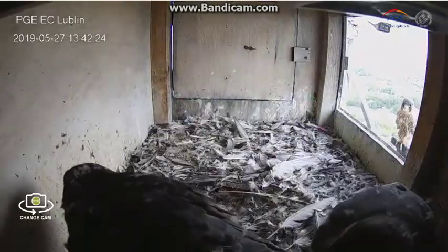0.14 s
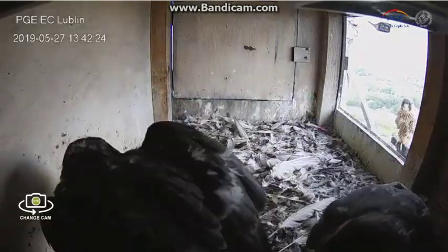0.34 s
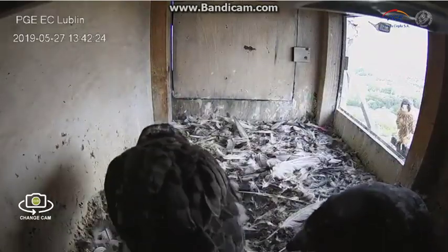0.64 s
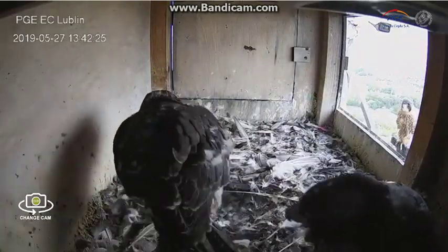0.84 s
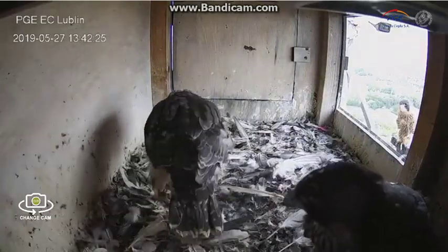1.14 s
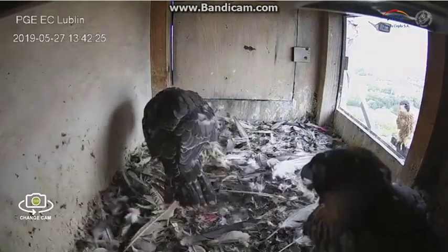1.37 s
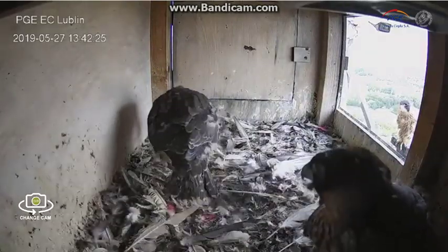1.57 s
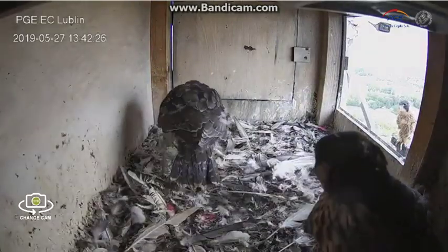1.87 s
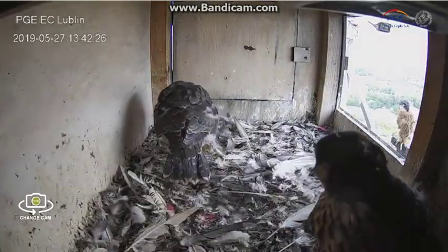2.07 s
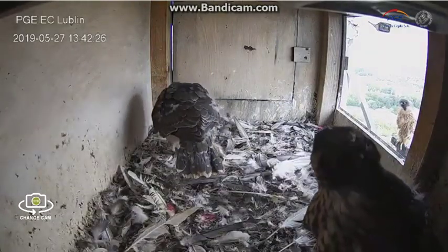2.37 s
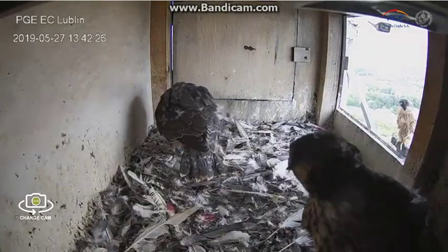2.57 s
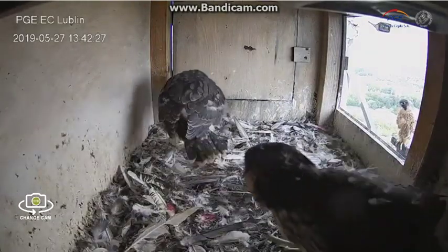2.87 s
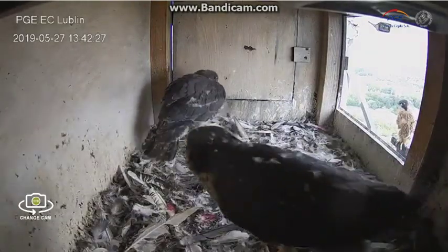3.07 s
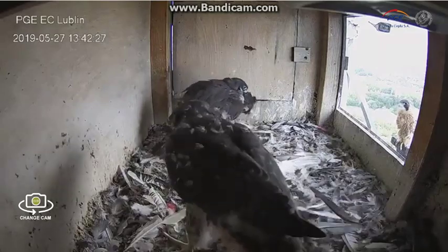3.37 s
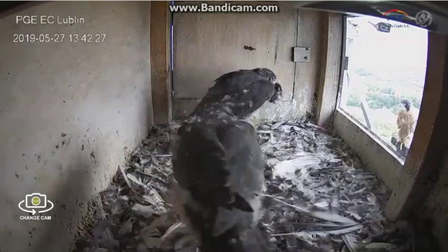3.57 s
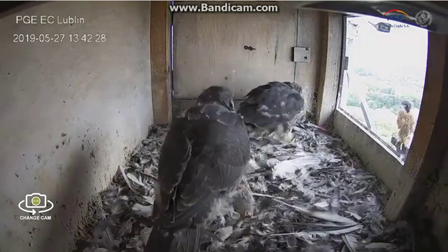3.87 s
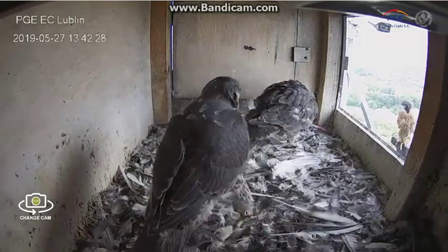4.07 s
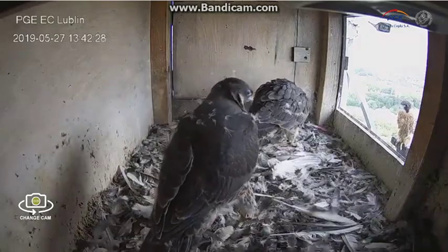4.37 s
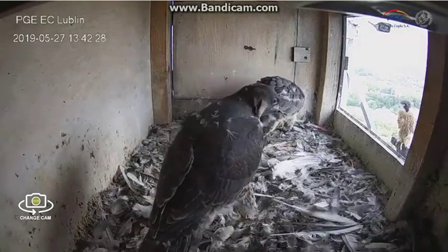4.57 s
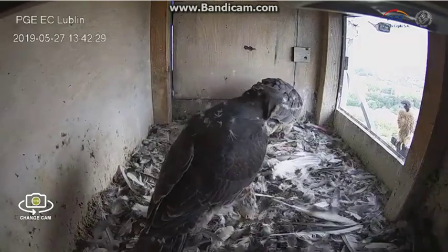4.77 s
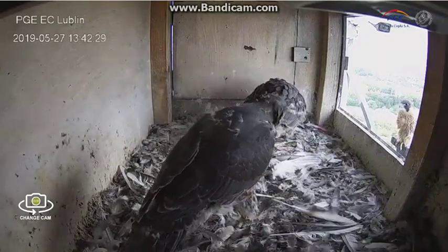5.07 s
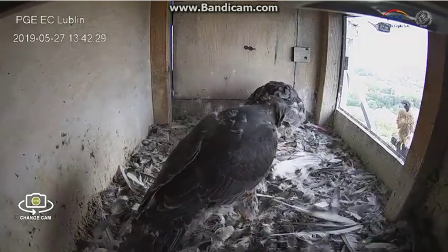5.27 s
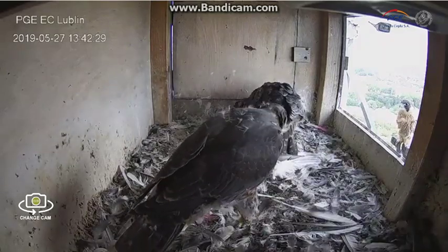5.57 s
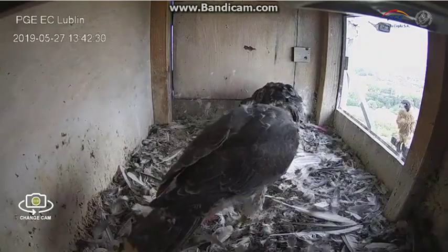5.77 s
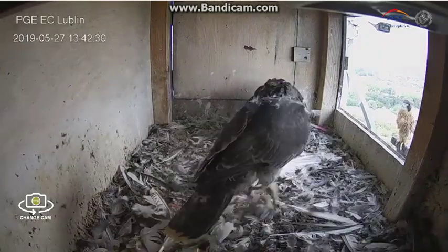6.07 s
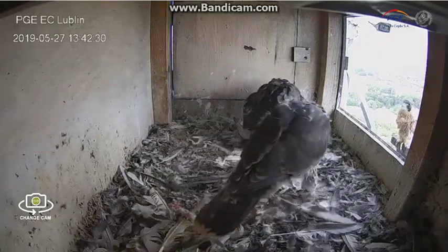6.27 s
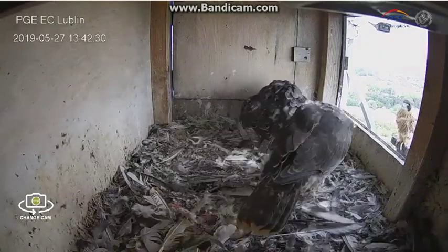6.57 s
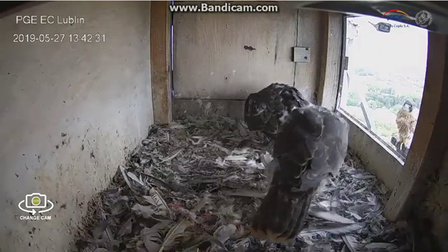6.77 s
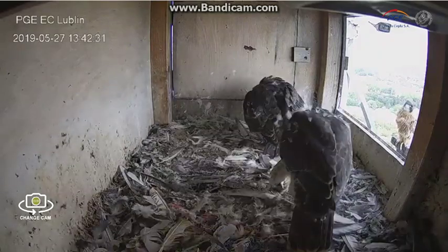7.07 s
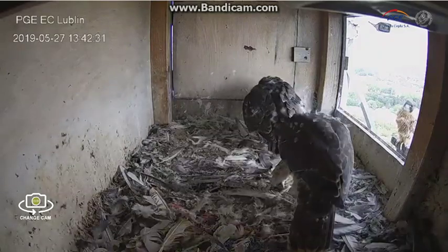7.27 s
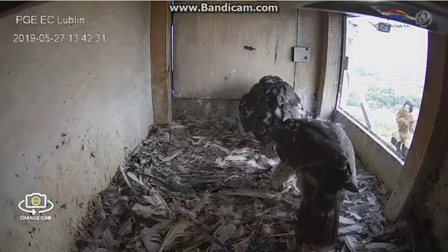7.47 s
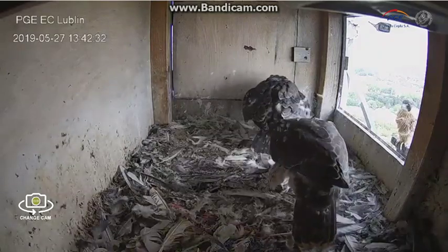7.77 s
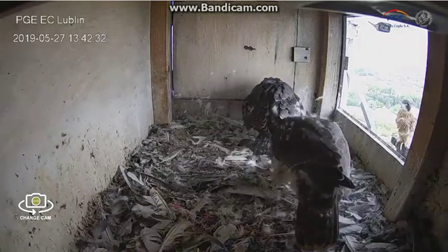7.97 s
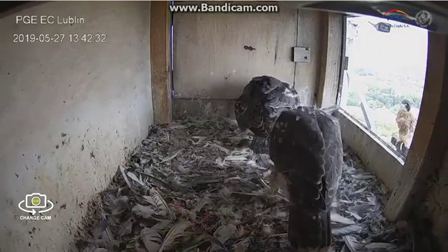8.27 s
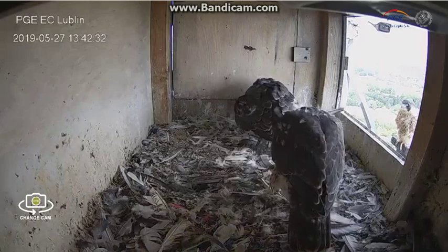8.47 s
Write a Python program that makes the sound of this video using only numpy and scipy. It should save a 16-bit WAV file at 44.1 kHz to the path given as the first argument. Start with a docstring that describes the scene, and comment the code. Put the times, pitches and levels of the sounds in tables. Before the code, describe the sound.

Young falcons shuffle in a wooden nest box, crunching dry feathers and litter, feet thumping boards over low wind rumble, the sound stuttering with tiny dropouts.

```python
"""Inside a wooden nest box, young falcons shuffle over dry feathers and prey remains while wind rumbles.
Showers of tiny filtered clicks make the litter rustle and crunch; damped sines make feet thump the boards.
Pulse trains through a throat filter give short hoarse clucks, and narrow noise bands give soft scuffs.
The nest camera's sound drops out for an instant about nine times a second, in a fixed pattern."""
import sys
import numpy as np
from scipy import signal
from scipy.fft import rfft, irfft, next_fast_len
from scipy.io import wavfile
from scipy.ndimage import uniform_filter1d, map_coordinates

SR = 44100
rng = np.random.default_rng(int(sys.argv[2]) if len(sys.argv) > 2 else 0)


def wav_out(sig):
    """Save sig, one row per channel (or a flat mono array), as 16-bit PCM at SR to the path in sys.argv[1]."""
    wavfile.write(sys.argv[1], SR, np.round(np.clip(np.atleast_2d(sig).T, -1, 1) * 32767).astype(np.int16))


N = 381024

# Slow course of the wind on the box. Each row: time in seconds, rumble level in dB.
WIND_COURSE = [(0, -50), (.55, -51.5), (.85, -53), (1.06, -61.5), (1.19, -39), (1.36, -57), (1.64, -47.5),
               (1.8, -45.5), (2.2, -63), (2.4, -52), (2.68, -61), (2.86, -47.5), (2.98, -57), (3.19, -47.5),
               (3.52, -50.5), (3.63, -55.5), (3.95, -48.5), (4.22, -46.5), (4.33, -55), (5.9, -55.5),
               (6.36, -55.5), (6.47, -48), (6.78, -50.5), (7.02, -56.5), (7.92, -50), (8.64, -48)]
GUST_DB, GUST_KNOTS_PER_S = 3, 10  # quick random flutter about the slow course

# Tone of the wind's rumble and of the outdoor air. Each row: frequency in Hz, relative gain in dB.
RUMBLE_SPECTRUM = [(12, -21.5), (20, -2), (30, 0.5), (43, 1.5), (60, 4), (89, -2.5), (124, -17), (188, -13),
                   (241, -26), (340, -43.5), (570, -120)]
AIR_SPECTRUM = [(82, -37), (140, -2.5), (189, 1.5), (247, -13), (317, -3), (618, -20.5), (953, -7.5),
                (1110, -16), (1470, -14.5), (2770, -29), (4890, -32.5), (5400, -35.5), (6170, -43),
                (7050, -34.5), (7540, -65), (9800, -67.5), (16600, -120)]

# Soft scuffs and squeaks while feeding. Each row: start in seconds, level in dB before a common trim,
# length in seconds, low resonance in Hz, starting high resonance in Hz, its glide in octaves a second.
SCUFF_EVENTS = [(4.247, -73, 0.058, 327, 1225, -0.5), (4.376, -67.5, 0.11, 439, 1435, 4.5),
                (4.437, -63.5, 0.053, 432, 1140, 2), (4.705, -57, 0.055, 360.6, 1252, 1.5),
                (4.758, -63.5, 0.079, 395, 1024, -3.5), (4.819, -62.5, 0.063, 340, 1420, 0),
                (4.882, -64.5, 0.044, 292, 1355, 6.5), (5.942, -63, 0.057, 324, 714, 3.5),
                (6.814, -64, 0.029, 305, 1000, 1)]

# Short hoarse clucks. Each row: start in seconds, level in dB before a common trim, length in seconds.
CLUCK_EVENTS = [(2.437, -45.5, 0.02), (5.093, -54, .032), (5.468, -54, 0.039), (8.498, -41.5, .014),
                (8.523, -42, 0.015), (8.623, -37.5, .025)]
# Resonances of the bird's throat. Each row: frequency in Hz, relative gain in dB.
THROAT_SPECTRUM = [(300, -52), (550, -19.5), (700, 4), (830, -24), (980, 0.5), (1100, 6), (1230, 5),
                   (1380, -13.5), (1530, -5), (1720, -22), (1880, -10), (2300, -51), (4000, -64)]

# Bumps that set a scrap or a panel ringing.
# Each row: start in seconds, level in dB, frequency in Hz, time to decay by 60 dB in seconds.
BUMP_EVENTS = [(0.478, -43.5, 936, 0.055), (0.987, -42.5, 1280, 0.047), (0.989, -41, 1770, 0.067),
               (1.04, -39.5, 690, 0.061), (1.164, -40.5, 1730, 0.069), (1.485, -55.5, 1835, 0.16),
               (2.089, -45, 197, 0.3), (3.478, -44.5, 1790, 0.059), (3.77, -44, 1455, 0.18),
               (3.796, -56, 966, 0.35), (4.265, -47, 313, 0.19), (5.114, -45, 193, 0.15),
               (5.985, -40.5, 206, 0.096), (6.375, -54.5, 860, 0.17), (6.63, -41.5, 334, 0.071),
               (7.879, -36.5, 189, 0.1), (7.972, -50.5, 1210, 0.14), (8.11, -42, 185, 0.2)]

# Steps on the floor boards. Each row: start in seconds, level in dB, hollow panel knock in dB relative to it.
STEP_EVENTS = [(.792, -39, -14.5), (1.145, -33.5, -16), (1.192, -38, -8.5), (1.232, -32, -24),
               (1.744, -38, -42), (1.87, -55, -3), (2.354, -36.5, -22.5), (2.586, -48, -4.5),
               (3.297, -35, -31), (3.479, -33.5, -28), (3.884, -29.5, -28), (5.077, -41, -37),
               (6.427, -36.5, -15), (6.69, -29.5, -16), (6.745, -30.5, -23.5), (8.082, -55, -7.5),
               (8.176, -32, -22), (8.238, -30.5, -38), (8.273, -43, -22)]
# Ringing modes of the floor boards and the thinner panels, varied a little at every step.
# Each row: nominal frequency in Hz, nominal level in dB, time to decay by 60 dB in seconds.
BOARD_MODES = [(55, -5, 0.43), (75.5, -4.5, .16)]
PANEL_MODES = [(119, 16.5, 0.063), (189.7, -0.5, 0.42), (301.7, -5.5, .12)]

# Talons and beaks crush the litter. Each row: snap time in seconds, level in dB before a common trim,
# woody body in dB, pitch of the breaking scrap in Hz, time for the cracks to thin by 60 dB in seconds.
CRUNCH_EVENTS = [(.003, -41.5, -5, 5750, 0.11), (.2242, -43, -23, 5470, .067),
                 (0.4447, -41, -12, 5550, 0.084), (.456, -37, -21, 4570, .07),
                 (0.4788, -35.5, -9.5, 4260, 0.079), (0.635, -40, -20, 3900, 0.18),
                 (0.6537, -37.5, -12, 5200, 0.056), (0.918, -47, -17, 5040, .085),
                 (0.9885, -29, -22, 5000, 0.046), (1.04, -33.5, -20, 3200, 0.077),
                 (1.1635, -31, -14, 5040, 0.063), (1.484, -36.5, -13, 5270, 0.082),
                 (2.9612, -41.5, -32, 4480, 0.067), (3.08, -31.5, -20, 4000, .065),
                 (3.125, -39, -16, 3850, 0.14), (3.1569, -39, -18, 3900, 0.12),
                 (3.209, -41.5, -21, 5270, 0.13), (3.38, -34, -15, 5250, 0.077),
                 (3.3898, -24.5, -20, 5170, 0.076), (3.412, -35.5, -11, 5100, 0.037),
                 (3.4383, -29.5, -12, 3550, 0.084), (3.5208, -36.5, -13, 5100, 0.17),
                 (3.746, -28, -17, 3200, 0.068), (3.766, -30, -15, 5970, .034),
                 (3.7708, -25.5, -10, 2700, .075), (3.7766, -23.5, -3.5, 4930, 0.055),
                 (3.8503, -28, -16, 5740, .06), (3.89, -36.5, -27, 5730, 0.079),
                 (4.0237, -43, -30, 5680, .11), (4.252, -37.5, -38, 5600, 0.074),
                 (5.744, -47, -21, 5010, .085), (6.206, -45.5, -16, 5120, .1),
                 (6.28, -41, -12, 5840, 0.061), (6.649, -30.5, -19, 5300, 0.028),
                 (7.9304, -43, -24, 5640, 0.11), (8.1798, -45, -7, 5000, 0.16)]
CRUNCH_RISE_S = .014  # the cracks before the snap grow at 60 dB in this time

# Tone of the dry litter, the woody body and the dull drag. Each row: frequency in Hz, relative gain in dB.
LITTER_SPECTRUM = [(1060, -16), (1800, -6), (1950, -6), (2230, -5.5), (2550, -9.5), (2920, -13), (3220, -3),
                   (4320, -3.5), (5490, 3), (6530, -13), (7270, -8.5), (7540, -44), (9800, -55.5),
                   (16600, -120)]
WOODY_SPECTRUM = [(200, -24.5), (350, -12), (480, -15), (700, -17.5), (1000, -1.5), (1400, -5.5),
                  (1800, -0.5), (2400, 10), (3500, -18)]
DRAG_SPECTRUM = [(150, -22), (320, 4), (550, -4.5), (750, -7), (1000, -3.5), (1600, -6), (2300, -20.5),
                 (4000, -33.5)]

# A bird sweeps a foot, wing or tail through the litter. Each row: start in seconds, length in seconds,
# dry rustle in dB, dull drag in dB, both the level a full push heads for.
STROKE_EVENTS = [(0, 0.013, -46.5, -57), (0.14, 0.027, -69, -75), (0.323, .06, -68, -69),
                 (0.426, 0.06, -59.5, -56), (0.517, .04, -59, -61.5), (0.626, 0.022, -54, -49),
                 (.77, 0.12, -73, -72), (0.874, 0.056, -57.5, -68), (0.973, .11, -63, -56.5),
                 (1.141, 0.096, -62.5, -58.5), (1.33, 0.051, -61.5, -74), (1.471, 0.064, -74, -70),
                 (1.724, 0.047, -72, -69), (2.44, .025, -96, -57.5), (2.505, 0.05, -64.5, -85),
                 (2.653, 0.028, -60, -67), (2.894, 0.061, -56.5, -65), (2.96, 0.067, -61, -63),
                 (3.042, .19, -58, -62.5), (3.316, 0.12, -58, -69), (3.477, 0.087, -56, -65.5),
                 (3.594, 0.14, -58.5, -66), (3.719, 0.056, -48.5, -57), (3.77, 0.034, -41, -45.5),
                 (3.815, 0.067, -58, -55), (4.012, 0.068, -67.5, -70), (4.204, 0.062, -72, -64.5),
                 (4.315, 0.085, -69.5, -74.5), (5.087, 0.018, -70.5, -65), (5.739, 0.053, -75, -88),
                 (5.93, 0.015, -66, -66), (6.097, 0.028, -58, -83), (6.173, 0.15, -64.5, -72.5),
                 (6.343, 0.075, -66.5, -68), (6.566, 0.13, -59, -67), (7.136, 0.029, -65, -62.5),
                 (7.206, 0.028, -68, -73), (7.897, 0.069, -56, -65), (7.945, 0.046, -71, -58),
                 (8.051, 0.032, -70, -69), (8.17, 0.032, -60, -64), (8.212, 0.083, -82, -71)]
STROKE_RISE_S, STROKE_FALL_S = 0.0085, 0.0094  # time constants of every stroke

# Between strokes the birds never keep quite still.
# Each row: time in seconds, faint dry rustle in dB, faint drag in dB, both about which the level swings.
FIDGET_COURSE = [(0, -73.5, -67.5), (1.6, -79.5, -71), (2.3, -81.5, -70), (2.9, -79, -71),
                 (4.0, -78.5, -69), (5.3, -88.5, -83), (6.4, -78, -71), (7.2, -85, -76), (8.1, -77, -69.5),
                 (8.64, -79.5, -76)]
FIDGET_SWING_DB, FIDGET_KNOTS_PER_S = 5.5, 12  # random swing of the fidgeting

# Dropouts of the sound stream: repeat time, length of each gap, gap starts within the cycle, all in seconds.
CYCLE_S, GAP_S, GAP_STARTS_S = .32, .0156, (.0614, .1414, .2614)
STREAM_TOP_HZ, HISS_TOP_HZ = 7500, 15800


def amp(db):
    """Decibels to gain."""
    return 10 ** (np.asarray(db) / 20)


def unit(x):
    """Scale to rms 1."""
    return x / np.sqrt(np.mean(x ** 2) + 1e-20)


def curves(rows):
    """One value per sample for each column after the time."""
    s, *columns = np.transpose(rows)
    return [np.interp(np.arange(N) / SR, s, column) for column in columns]


def wobble(rate):
    """A smooth random curve with this many knots a second."""
    knots = rng.standard_normal(int(N * rate / SR) + 4)
    return map_coordinates(knots, [np.arange(N) * rate / SR])


def colour(x, points):
    """Causal minimum-phase filter with the gain of (Hz, dB) points."""
    m = 2 * next_fast_len(len(x) // 2 + 4096)
    f, db = np.transpose(points)
    gain = amp(np.interp(np.log(np.fft.rfftfreq(m, 1 / SR) + 1), np.log(f), db))
    # Folding the cepstrum forward in time gives the causal phase.
    cepstrum = irfft(np.log(np.maximum(gain, 1e-6)))
    cepstrum[1:m // 2] *= 2
    cepstrum[m // 2 + 1:] = 0
    return irfft(rfft(x, m) * np.exp(rfft(cepstrum)))[:len(x)]


def resonate(x, hz, width_hz):
    """One resonance."""
    return signal.lfilter(*signal.iirpeak(hz, hz / width_hz, SR), x)


def low_pass(x, hz):
    """A steep band limit."""
    return signal.sosfiltfilt(signal.butter(24, hz, fs=SR, output="sos"), x)


def add(track, s, sound):
    """Mix a sound in at time s."""
    part = track[max(round(s * SR), 0):][:len(sound)]
    part += sound[:len(part)]


def clicks(n, rate, spread_db):
    """Random tiny fractures, rate a second, a few much bigger than the rest."""
    size = amp(spread_db * np.minimum(rng.exponential(size=n), 4))
    return (rng.random(n) < rate / SR) * size * rng.choice([-1, 1], n)


def box(x, t60, wet_db):
    """Direct sound plus the quick dense echoes of the close walls."""
    t = np.arange(SR // 6) / SR
    tail = rng.standard_normal(len(t)) * amp(-60 * t / t60)
    echoes = signal.fftconvolve(x, tail / np.linalg.norm(tail))[:len(x)]
    return x + amp(wet_db) * echoes


def swell(t, length, rise, fall):
    """A soft rise, a hold and a fall, with time constants in seconds."""
    return (1 - np.exp(-t / rise)) * np.exp(-np.maximum(t - length, 0) / fall)


def patchy(x, depth_db, size=512):
    """Let narrow parts of the spectrum swell and fade on their own, at rms 1."""
    z = signal.stft(x, nperseg=size)[2]
    field = uniform_filter1d(rng.standard_normal(z.shape), size=5, axis=0)  # across frequency
    field = uniform_filter1d(field, size=7, axis=1)  # across time
    return unit(signal.istft(z * amp(depth_db * unit(field)), nperseg=size)[1][:len(x)])


def even(x, window_s):
    """Hold the short-term rms near 1, leaving the fine grain spiky."""
    power = uniform_filter1d(x ** 2, max(round(window_s * SR), 1))
    return x / np.sqrt(np.abs(power) + 1e-9)


def narrow(t, hz, width_hz):
    """Noise in a narrow band whose centre may move: slow noise riding on a carrier."""
    band = signal.butter(2, width_hz / 2, fs=SR, output="sos")
    slow = signal.sosfilt(band, rng.standard_normal((2, len(t))))
    phase = 2 * np.pi * np.cumsum(hz * np.ones(len(t))) / SR
    return unit(slow[0] * np.cos(phase) + slow[1] * np.sin(phase))


def drone(hz, width_hz):
    """Noise through the same resonance twice, a faint sustained tone."""
    once = resonate(rng.standard_normal(N), hz, width_hz)
    return unit(resonate(once, hz, width_hz))


def wind():
    """Gusts rumble in the box over the outdoor air and two faint narrow drones."""
    rumble_db, = curves(WIND_COURSE)
    rumble = unit(colour(rng.standard_normal(N), RUMBLE_SPECTRUM))
    # Partly flatten its own swells, so that the gusts lead.
    rumble = unit(rumble / np.abs(signal.hilbert(rumble)) ** .35)
    gusts = amp(rumble_db + GUST_DB * wobble(GUST_KNOTS_PER_S)) * rumble
    air = patchy(colour(rng.standard_normal(N), AIR_SPECTRUM), depth_db=4.0, size=1024)
    air = air * amp(-64.5 + 2.1 * wobble(6.3))
    high_drone = amp(-78.5) * drone(314, width_hz=24)
    hollow_drone = amp(-78.0 + 0.92 * wobble(9.8)) * drone(192, width_hz=55)
    return gusts + air + high_drone + hollow_drone


def scuffs():
    """Soft rubs, each ringing in two narrow resonances; the upper one may glide."""
    out, t = np.zeros(N), np.arange(SR // 6) / SR
    for s, db, length, low_hz, high_hz, glide in SCUFF_EVENTS:
        low = narrow(t, low_hz, width_hz=150)
        high = narrow(t, high_hz * 2 ** (glide * t), width_hz=130)
        rub = low + amp(-2.5) * high
        add(out, s, amp(db - 1.5) * rub * swell(t, length, rise=0.0022, fall=0.0022))
    return out


def clucks():
    """Brief uneven pulse trains through a bird's throat, with a little rasp."""
    out, t = np.zeros(N), np.arange(SR // 8) / SR
    for s, db, length in CLUCK_EVENTS:
        # About 308 pulses a second, uneven in spacing and strength.
        beats = np.cumsum(SR / 308 * (1 + .035 * rng.standard_normal(30)))
        strengths = amp(rng.normal(0, 1.4, len(beats)))
        pulses = np.bincount((beats - beats[0]).astype(int), strengths, minlength=len(t))[:len(t)]
        source = unit(pulses) + .2 * rng.standard_normal(len(t))
        call = unit(colour(source, THROAT_SPECTRUM)) * swell(t, length, rise=0.0016, fall=0.0016)
        add(out, s, amp(db - 9.5) * box(call, t60=.04, wet_db=-8.5))
    return out


def bumps():
    """One damped mode rings after each bump; low ones take longer to build."""
    out, t = np.zeros(N), np.arange(SR // 4) / SR
    for s, db, hz, t60 in BUMP_EVENTS:
        build = 1 - np.exp(-t * hz / 2)
        add(out, s, amp(db - 60 * t / t60) * build * np.sin(2 * np.pi * hz * t))
    return out


def ring(t, modes):
    """Damped sines of struck wood, each a little off its nominal level and pitch."""
    total = np.zeros(len(t))
    for hz, db, t60 in modes:
        decay = amp(db + rng.normal(0, 1.0) - 60 * t / t60)
        total += decay * np.sin(2 * np.pi * hz * rng.normal(1, 0.034) * t)
    return total


def steps():
    """A foot sets the floor swinging and knocks the thinner panels."""
    out, t = np.zeros(N), np.arange(SR // 3) / SR
    soft_onset = 1 - np.exp(-t / 0.004)
    for s, db, knock_db in STEP_EVENTS:
        thump = ring(t, BOARD_MODES) + amp(knock_db) * ring(t, PANEL_MODES)
        add(out, s, amp(db) * soft_onset * thump)
    return out


def crunches():
    """A scrap starts to give, snaps, and sheds a quickly thinning shower of smaller cracks in its own colour."""
    out, lead = np.zeros(N), SR // 100  # 10 ms of giving way before the snap
    t = np.arange(-lead, SR // 5) / SR
    for s, db, body_db, scrap_hz, t60 in CRUNCH_EVENTS:
        fade_db = -60 * np.where(t < 0, -t / CRUNCH_RISE_S, t / t60)
        shower = clicks(len(t), rate=1500, spread_db=2.5) * amp(fade_db)
        shower /= np.linalg.norm(shower) + 1e-9
        shower[lead] += .8  # the snap
        shower = patchy(box(shower, t60=0.045, wet_db=8.0), depth_db=6.5)
        plain = colour(shower, LITTER_SPECTRUM)
        bright = unit(unit(plain) + 0.91 * unit(resonate(plain, scrap_hz, 530)))
        woody = amp(body_db) * unit(colour(shower, WOODY_SPECTRUM))
        add(out, s + t[0], amp(db - 25.0) * (bright + woody))
    return out


def rustle():
    """Strokes make feathers and dry scraps crackle and drag dully on the floor; faint fidgeting fills the pauses."""
    fidget_db = curves(FIDGET_COURSE) + FIDGET_SWING_DB * wobble(FIDGET_KNOTS_PER_S)
    dry_level, drag_level = amp(fidget_db)
    t = np.arange(SR // 2) / SR
    for s, length, dry_db, drag_db in STROKE_EVENTS:
        push = swell(t, length, STROKE_RISE_S, STROKE_FALL_S)
        add(dry_level, s, amp(dry_db) * push)
        add(drag_level, s, amp(drag_db) * push)
    grains = box(clicks(N, rate=600, spread_db=7.0), t60=0.073, wet_db=4.0)
    crackle = even(patchy(colour(grains, LITTER_SPECTRUM), depth_db=6.0), window_s=.04)
    rubs = box(clicks(N, rate=600, spread_db=4.5), t60=0.1, wet_db=6.0)
    drag = even(patchy(colour(rubs, DRAG_SPECTRUM), depth_db=3.0, size=1024), window_s=.05)
    return crackle * dry_level + drag * drag_level


def scene():
    """Everything heard inside the box, as one channel."""
    background = wind() + scuffs() + clucks()
    movement = bumps() + steps() + crunches() + rustle()
    return (background + movement)[None]


def record(dry):
    """The narrow-band stream drops out in a fixed pattern; a bass cut rounds off each gap, over a very faint hiss."""
    t = np.arange(N) / SR
    lost = sum((t - start) % CYCLE_S < GAP_S for start in GAP_STARTS_S)
    bass_cut = signal.butter(1, 36, "high", fs=SR)
    chopped = signal.lfilter(*bass_cut, dry * (1 - lost))
    stream = low_pass(chopped, STREAM_TOP_HZ)
    hiss = amp(-94.5) * rng.standard_normal(N)
    return low_pass(stream + hiss, HISS_TOP_HZ)


dry = scene()
out = record(dry)
wav_out(out)
```